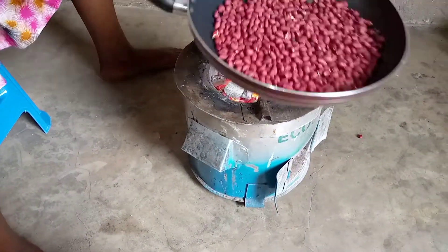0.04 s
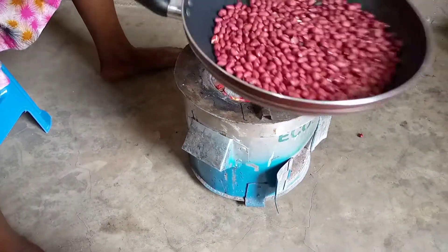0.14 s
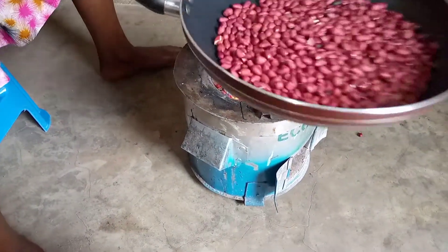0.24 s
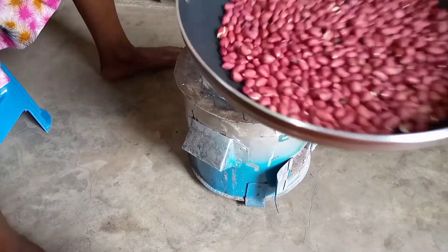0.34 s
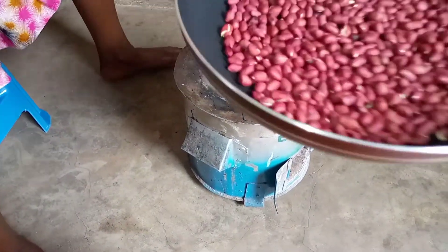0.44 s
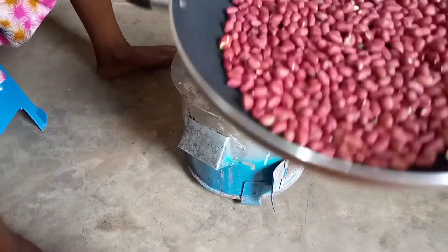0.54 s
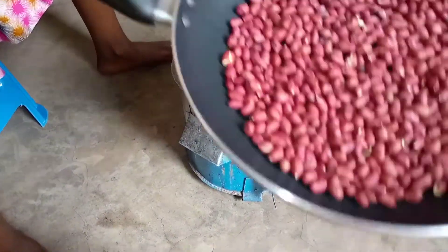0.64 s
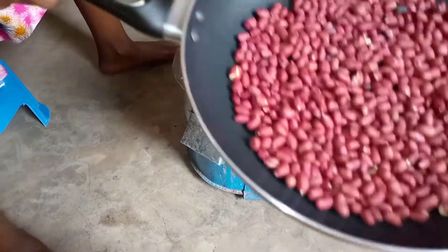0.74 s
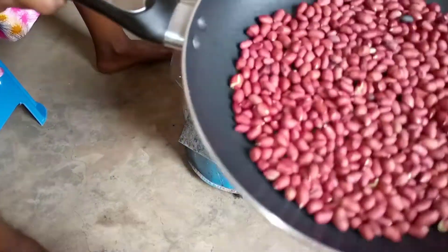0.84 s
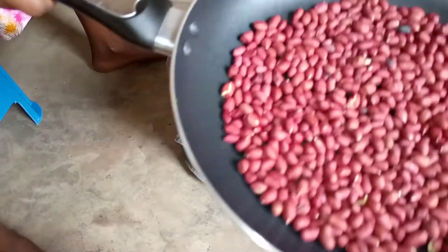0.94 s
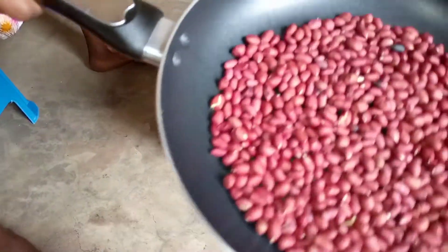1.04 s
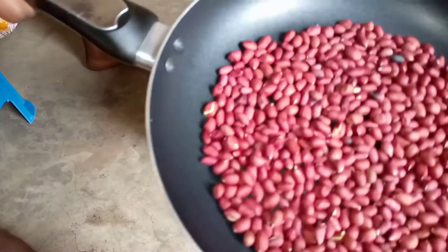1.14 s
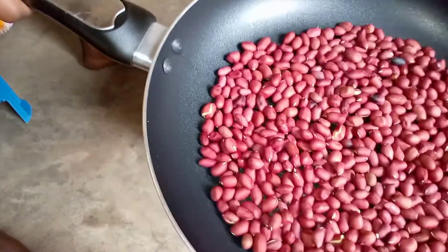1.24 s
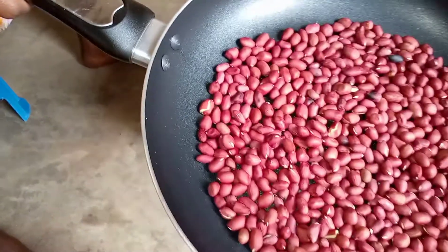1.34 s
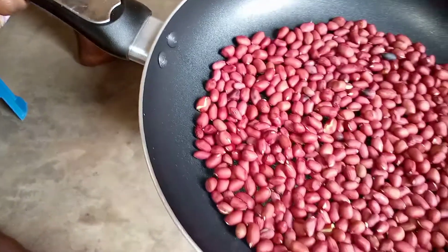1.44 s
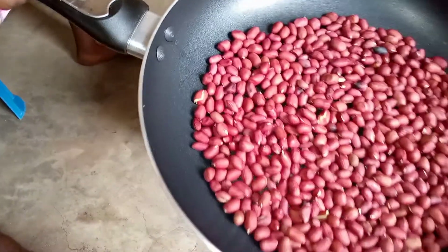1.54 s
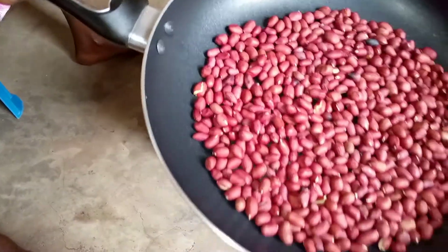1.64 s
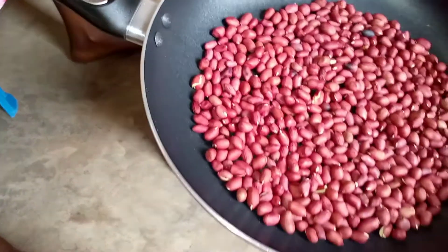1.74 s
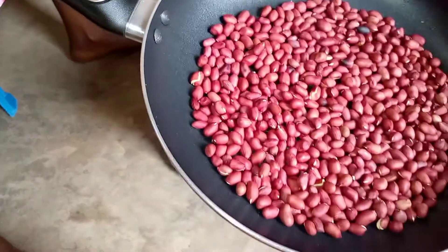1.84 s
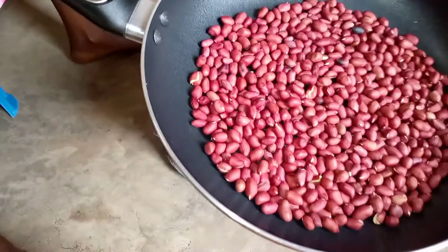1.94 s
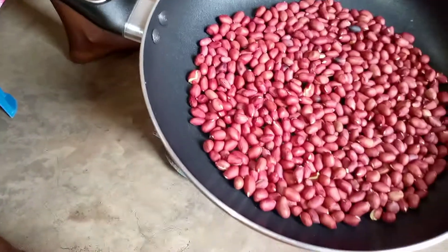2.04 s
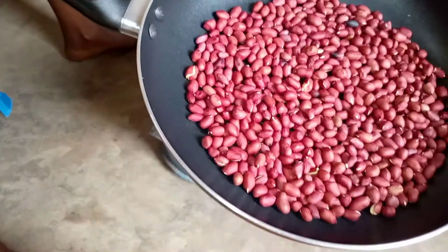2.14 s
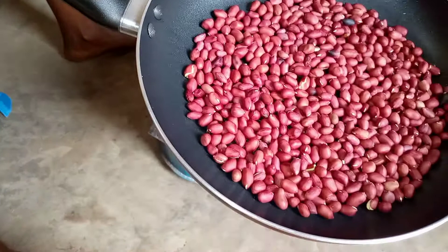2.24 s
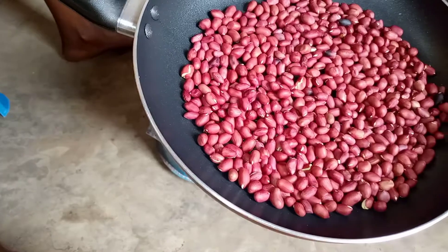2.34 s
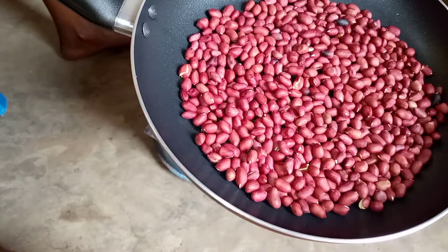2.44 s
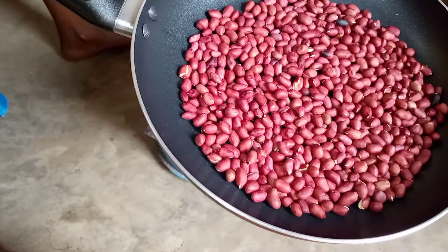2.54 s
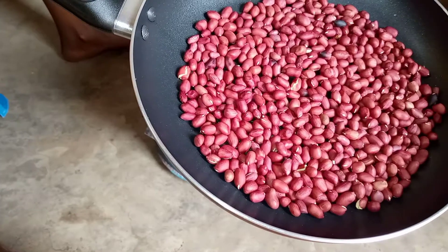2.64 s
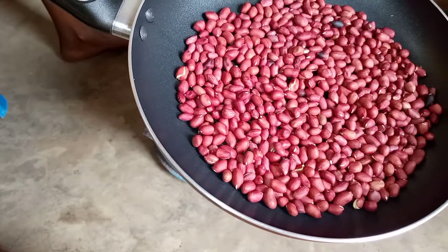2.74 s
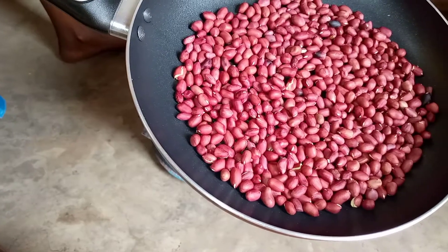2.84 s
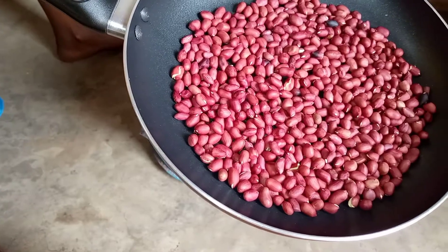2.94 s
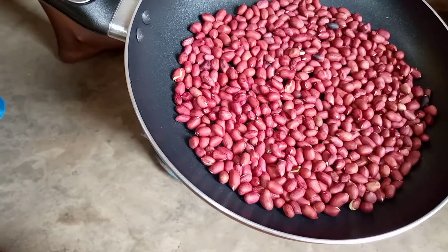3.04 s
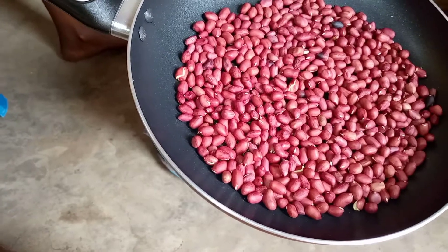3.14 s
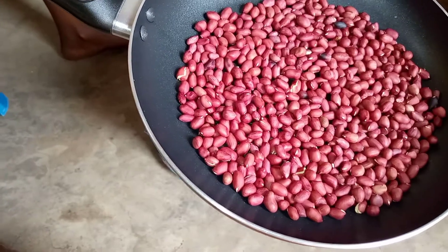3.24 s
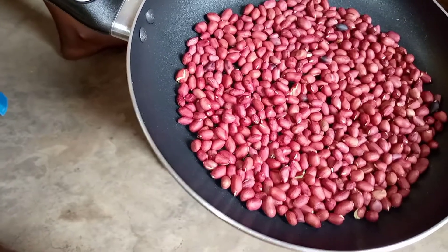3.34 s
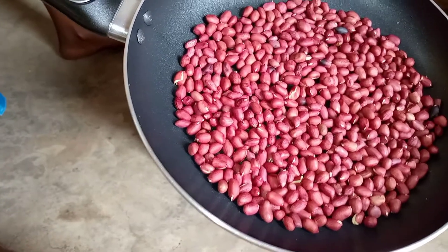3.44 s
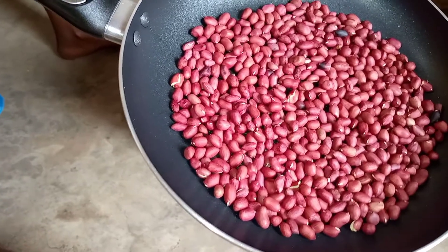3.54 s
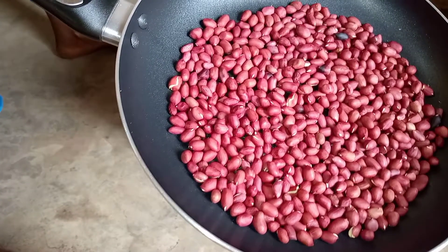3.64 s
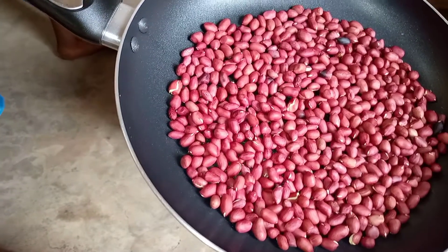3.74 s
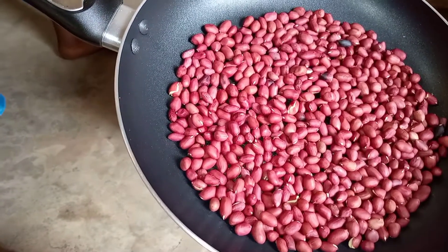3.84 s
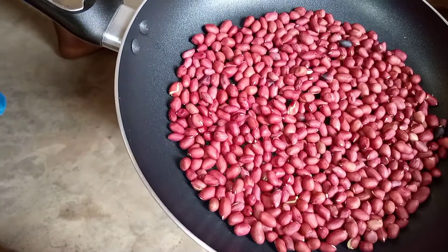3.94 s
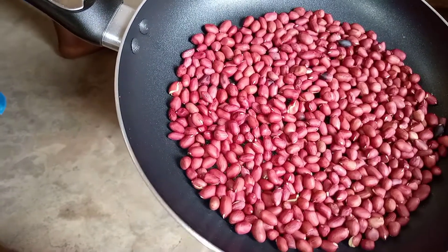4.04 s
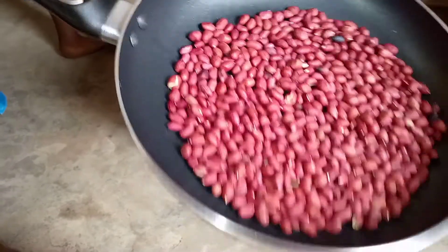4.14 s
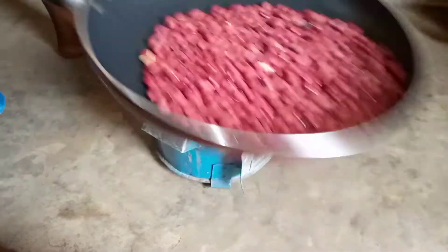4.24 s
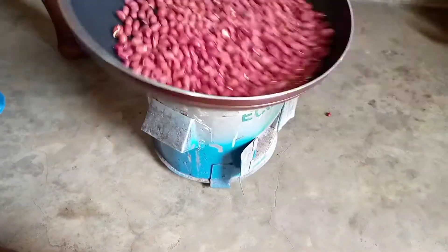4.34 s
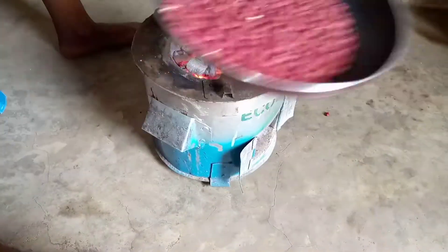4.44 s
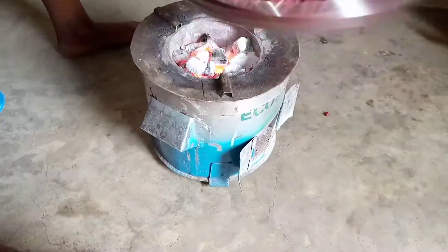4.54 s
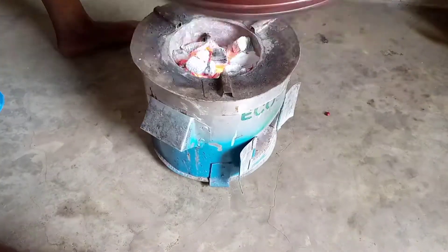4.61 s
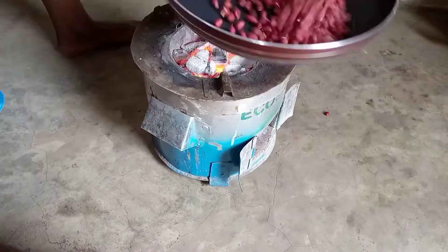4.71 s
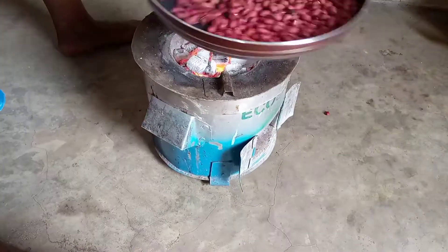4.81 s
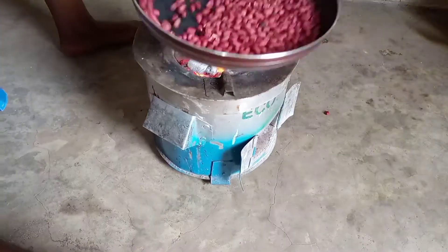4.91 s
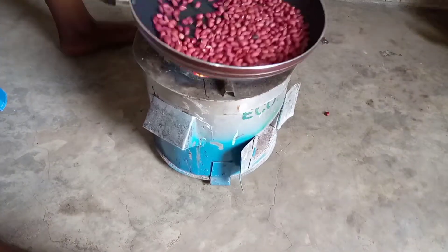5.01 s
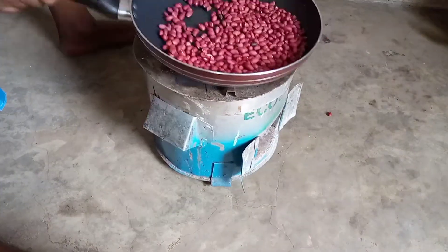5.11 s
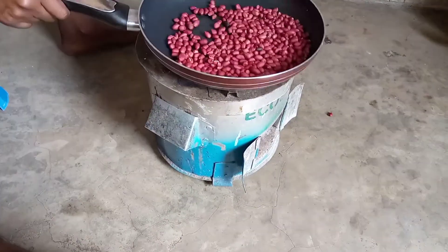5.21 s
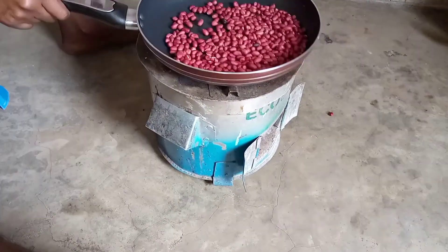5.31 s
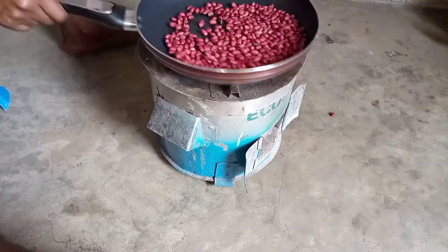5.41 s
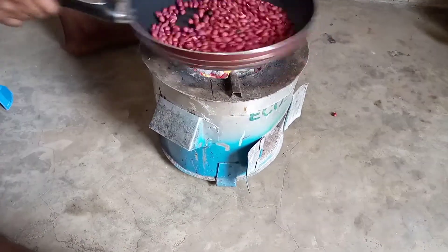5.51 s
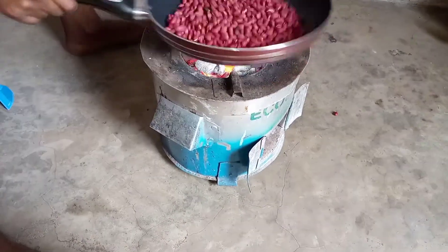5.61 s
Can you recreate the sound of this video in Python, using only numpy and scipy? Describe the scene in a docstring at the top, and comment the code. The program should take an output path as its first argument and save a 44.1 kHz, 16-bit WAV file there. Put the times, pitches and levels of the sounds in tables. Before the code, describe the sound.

Peanuts rattle in a shaken pan, then the pan clacks onto a charcoal stove, amid sharp charcoal snaps and insect buzz.

```python
"""Peanut pan on a charcoal stove

Close by, a pan of peanuts is lifted off a charcoal stove, held still, then swung back, shaken and set down.
Small blows of the sliding nuts ring the pan's modes; charcoal snaps are sharp pulses echoed by hard walls.
Outdoors, insects buzz (a wavering row of partials), chirp and hiss over a low rumble and midrange noise.
At the microphone a fast limiter, keyed by the treble, ducks everything after the loudest snaps."""
import sys
import numpy as np
from scipy import signal
from scipy.fft import rfft, irfft
from scipy.io import wavfile
from scipy.ndimage import uniform_filter1d

SR = 44100
rng = np.random.default_rng(int(sys.argv[2]) if len(sys.argv) > 2 else 0)


def to_wav(s):
    """Save 16-bit WAV."""
    ch = np.atleast_2d(s).T  # columns
    pcm = np.round(np.clip(ch, -1, 1) * 32767)  # PCM
    wavfile.write(sys.argv[1], SR, pcm.astype(np.int16))


N = 250047
T = np.arange(N) / SR
HZ = np.fft.rfftfreq(N, 1 / SR)

# Spectrum levels are relative within each table.
# Modes of the loaded pan: [f/Hz, width/Hz, level/dB]
PAN_MODES = [(638, 19, -7), (694, 20, -8), (813, 22, -18), (985, 30, -11), (1022, 17, -3), (1109, 16, -12),
             (1618, 22, 1), (1734, 22, -11), (2286, 22, -4), (2442, 28, 2.5), (2792, 16, -5),
             (3392, 17, -10), (3723, 12, -5), (4090, 35, -21), (4430, 50, -14), (4530, 45, -11),
             (5086, 32, -11), (5475, 20, -12), (6030, 60, -20), (6420, 32, -13), (6614, 32, -9),
             (7610, 120, -24), (7800, 60, -24), (8230, 40, -27), (8470, 48, -27)]
# Click of nut on nut: [f/Hz, level/dB]
NUT_CLICK = [(60, -44), (150, -27), (330, -18), (490, -28), (650, -10), (1200, -6), (2500, -9), (3100, -17),
             (4700, -9), (7000, -15), (8100, -22), (9700, -18), (10500, -30), (13600, -37), (15200, -26)]
# Slides of the heap: [peak t/s, rise/s, level/dB, fade/(dB/s), bass level/dB, treble level/dB];
# bass and treble are relative to the slide's level
NUT_SLIDES = [(0.0, .05, -30, 150, 1, -10.5), (4.306, 0.09, -40, 74, 10.5, -2),
              (4.477, 0.095, -27.5, 155, 4, -7.5), (4.612, 0.088, -29, 123, 5, -3.5),
              (4.739, 0.02, -22, 55, -3, -10), (4.813, 0.054, -21.5, 105, 0.5, -5),
              (4.918, 0.13, -26.5, 152, -9.5, -4.5), (5.084, 0.11, -45.5, 225.5, 0, 3.5),
              (5.35, 0.089, -43.5, 118, -2.5, -4), (5.622, 0.09, -32, 42, -1, -7.5)]
# Charcoal snaps, relative levels: [t/s, level/dB, brightness/(dB/octave), room level/dB re the snap]
CHARCOAL_SNAPS = [(0.2213, 4, 5.5, -4.5), (0.4452, -37, 2.5, -0.5), (1.1003, -31.5, 5.5, -2),
                  (1.878, -24, 7, -4.5), (2.1109, 4, 0.5, -7.5), (2.179, -16.5, 6, -16),
                  (2.2758, -13.5, 13, -14), (2.5137, -32, 23, -14), (2.6705, -37.5, 23, -14),
                  (2.7313, -20, 3.5, 1.5), (3.162, -30, 7, -8.5), (3.2596, -22.5, 13, -9.5),
                  (3.3206, -27.5, 3, -12), (3.8722, -37, 7, -7.5), (4.4896, -18.5, 8.5, -3.5)]
# Sharp pulse of a snap or a clack: [f/Hz, level/dB]
SNAP_SPECTRUM = [(180, -65), (300, -25), (478, -36), (634, -15), (1190, -12), (2480, -4), (3290, -14),
                 (4370, -3), (5430, -6.5), (6410, 0), (9550, -17), (11500, -21), (13300, -23.5),
                 (15000, -16), (16000, -57.5)]
# The pan knocks on the stove's rest, lands and rocks once:
# [t/s, clack level/dB, thud level/dB, grating level/dB]
PAN_KNOCKS = [(5.2174, -5.5, -36.5, -31.5), (5.327, -20.5, -42.5, -26.5)]
# Dull thud of pan on stove: [f/Hz, level/dB]
THUD_SPECTRUM = [(25, -36), (60, -21.5), (160, -14.5), (340, -15.5), (500, -18.5), (900, -77), (3000, -70)]
# Grit crushed under the pan: [f/Hz, level/dB]
GRIT_SPECTRUM = [(290, -40), (500, -36), (631, -26), (807, -7), (880, -14), (946, -16), (1720, -12),
                 (2390, 6.5), (2890, -8.5), (3200, -29), (4660, 6.5), (5710, -15), (6800, -1.5),
                 (8090, -42), (16000, -63)]
# Echo decay of the surroundings: [f/Hz, t60/s]
ROOM_DECAY = [(150, 0.13), (1000, 0.27), (4000, 0.31), (8000, 0.25), (15000, 0.089)]
# Click rate of the cicada: [t/s, f/Hz]
CICADA_RATE = [(.7, 123), (1.3, 122.5), (3, 122.7), (4, 123.2), (5.67, 122.8)]
# Resonance of the cicada's drum: [f/Hz, level/dB]
CICADA_DRUM = [(5900, -24.5), (6150, -4), (6270, -32), (6390, 5), (6630, 1), (6760, 9.5), (6880, 0),
               (7120, 4.5), (7330, -9), (7490, -2.5), (7600, -12), (7720, -7.5), (7850, -20), (8000, -34)]
# Hiss of the far insects: [f/Hz, level/dB]
CHORUS_SPECTRUM = [(3000, -25), (3900, -27), (4200, -12), (5200, -1.5), (5900, -7.5), (6400, 3.5),
                   (6900, 13), (7400, -6), (8100, -16.5), (9500, -34), (14000, -46), (15500, -25.5)]
# Low rumble: [f/Hz, level/dB]
RUMBLE_SPECTRUM = [(15, -46.5), (25, -24.5), (59, -5), (141, -4), (205, -9), (246, -12.5), (282, -12),
                   (327, -5.5), (399, -18.5), (480, -16), (620, -52), (1060, -120)]
# Course of the rumble, before its gain: [t/s, level/dB]
RUMBLE_COURSE = [(0.0, -64), (0.74, -68.5), (1.76, -65.5), (2.29, -68.5), (2.91, -74), (3.56, -70),
                 (3.91, -75.5), (4.4, -69), (5.1, -73)]
# Midrange wash: [f/Hz, level/dB]
WASH_SPECTRUM = [(260, -67), (450, -8), (583, 1), (749, -2), (811, -1), (1120, -2), (1670, -3.5),
                 (2240, -13.5), (2430, -12.5), (3800, -40.5), (4940, -71), (8360, -120)]
# Course of the wash, before its gain: [t/s, level/dB]
WASH_COURSE = [(0.4, -61.5), (0.92, -66.5), (2.35, -60), (2.9, -66), (3.15, -64), (3.6, -73.5),
               (4.1, -77.5)]
# Colour of the microphone: [f/Hz, level/dB]
MIC_COLOUR = [(390, 0), (480, -6), (590, 0), (10000, 0), (11000, -3), (13500, -3), (14500, 0)]

SLIDE_RISE_DB = 20  # a slide swells by this much during its rise
# Treble rise time and fade rate of a slide, relative to the body's
TREBLE_RISE_RATIO, TREBLE_FADE_RATIO = 0.98, 1
# The skins' rustle lies above this pitch and follows only a share of a slide's treble level
RUSTLE_HZ, RUSTLE_DB, RUSTLE_SHARE = 7900, -16, 0.44
GRATE_RISE_S, GRATE_HOLD_S, GRATE_FADE_DB_PER_S = 0.003, 0.021, 244
CHIRP_FIRST_S, CHIRP_EVERY_S = 0.502, 0.2607
CHIRP_START_DB, CHIRP_GROWTH_DB_PER_S = -64, 0.5
HUM_DB, HUM_END_S, HUM_FADE_DB_PER_S = -59, 0.77, 200
BAND_EDGE_HZ = 16200


def peanuts(hits_per_s=4800, spread_db=3.5, treble_db=4.0, bass_hz=1300, split_hz=3100,
            roam_db=6.5, clump_db=3.0, wet_db=-5, count=16):
    """Thousands of small clumped blows click on other nuts and ring the pan; slides differ in brightness."""
    rattle = np.zeros(N)
    clumps_db = clump_db * flutter(52).real
    for spot in pan_spots(count):
        load = amp(roam_db * flutter(9.5).real + clumps_db)  # the heap roams from spot to spot
        hits = load * blows(hits_per_s / count, spread_db)
        rattle += signal.oaconvolve(hits, spot)[:N]

    treble = above(rattle, split_hz)
    body = rattle - treble
    middle = above(body, bass_hz)
    bass = body - middle
    treble = treble + amp(wet_db) * room(treble).mean(0)  # echoes fill the gaps between the clicks
    rustle = above(treble, RUSTLE_HZ)

    strength = np.sqrt(uniform_filter1d(body ** 2, size=2000))  # so the shake alone sets the slow level
    low, mid, top, air = np.sqrt(sum(slide_powers(*row) for row in NUT_SLIDES))
    shaken = low * bass + mid * middle + amp(treble_db) * top * (treble - rustle) + air * rustle
    return shaken / strength


def pan_spots(count, nut_db=-18):
    """Each spot on the pan answers a blow with all modes and a nut click.

    Each mode starts upward at half of the spots, downward at the others."""
    t = np.arange(SR // 4) / SR
    signs = rng.permuted(np.tile([-1., 1.], (len(PAN_MODES), count // 2)), axis=1)
    spots = np.zeros((count, len(t)))
    for (hz, width, db), sign in zip(PAN_MODES, signs):
        ring = np.exp(-np.pi * width * t) * np.cos(2 * np.pi * hz * t)
        spots += amp(db) * 2 * np.pi * width / SR * ring * sign[:, None]
    for spot in spots:
        add(spot, 0, amp(nut_db) * click(NUT_CLICK))
    return spots


def slide_powers(s, rise, db, fade, low_db, top_db):
    """Power of one slide in the bass, the middle, the treble and the rustle."""
    top_rise, top_fade = rise * TREBLE_RISE_RATIO, fade * TREBLE_FADE_RATIO
    rustle_db = RUSTLE_DB + RUSTLE_SHARE * (db + top_db)
    return np.array([slide(s, rise, db + low_db, fade),
                     slide(s, rise, db, fade),
                     slide(s, top_rise, db + top_db, top_fade),
                     slide(s, top_rise, rustle_db, fade)])


def slide(peak_s, rise_s, db, fade_db_per_s):
    """Power of one slide: the heap gathers speed, then runs out."""
    swell_db = -SLIDE_RISE_DB * (np.maximum(peak_s - T, 0) / rise_s) ** 2
    fall_db = -fade_db_per_s * np.maximum(T - peak_s, 0)
    return amp(db + swell_db + fall_db) ** 2


def blows(per_s, spread_db):
    """Random small impacts, a few of them large."""
    sizes = amp(spread_db * np.minimum(rng.exponential(1, N), 4))
    return (rng.random(N) < per_s / SR) * sizes * rng.choice([-1, 1], N)


def charcoal(crumble_db=-21, side_db=-11, lump_hz=4600, lump_db=-15, lump_s=0.00061):
    """Sharp pulse, brief lump ring, splintering; a little random treble differs between left and right."""
    direct, side, sent = np.zeros(N), np.zeros(N), np.zeros(N)
    t = np.arange(400) / SR
    crack = (t == 0) + amp(lump_db) * np.exp(-t / lump_s) * np.cos(2 * np.pi * lump_hz * t)
    grits = rng.standard_normal((len(CHARCOAL_SNAPS), 2, len(t)))
    for (s, db, tilt_db, room_db), grit in zip(CHARCOAL_SNAPS, grits):
        pulse = click(SNAP_SPECTRUM, tilt_db)
        pulse *= 3.2 * amp(db) / np.linalg.norm(pulse)
        splinters, side_grit = grit * np.exp(-t / 0.0016) * (t > 0)
        snap = np.convolve(pulse, crack + amp(crumble_db) * splinters)
        # ring and splinters leave the energy of the snap unchanged
        add(direct, s, snap * np.linalg.norm(pulse) / np.linalg.norm(snap))
        add(side, s, amp(side_db) * np.convolve(pulse, side_grit / np.linalg.norm(side_grit)))
        add(sent, s, amp(room_db) * pulse)
    side = signal.sosfilt(signal.butter(4, 7000, "high", fs=SR, output="sos"), side)
    return direct + np.array([side, -side]) + room(sent)


def clacks(ring_db=-12, ring_s=0.00067, room_db=9):
    """The hard, gritty contact of pan and stove, and its echo from the walls."""
    t = np.arange(600) / SR
    direct, sent = np.zeros(N), np.zeros(N)
    pulse = click(SNAP_SPECTRUM)
    pulse = pulse / np.linalg.norm(pulse)
    grits = rng.standard_normal((len(PAN_KNOCKS), len(t)))
    for (s, db, _, _), grit in zip(PAN_KNOCKS, grits):
        contact = (t == 0) + amp(ring_db) * grit * np.exp(-t / ring_s)
        add(direct, s, amp(db) * np.convolve(pulse, contact))
        add(sent, s, amp(db + room_db) * pulse)
    return direct + room(sent)


def bumps(t60=0.31, rise_s=0.016, boom_hz=55, boom_width_hz=14, boom_db=-21, boom_t60=1.7):
    """Dull thuds of the pan on the stove, as decaying noise; a deep boom lingers."""
    thud, out = noise(THUD_SPECTRUM), np.zeros(N)
    boom = unit((flutter(boom_width_hz) * np.exp(2j * np.pi * boom_hz * T)).real)
    for s, _, db, _ in PAN_KNOCKS:
        age = np.maximum(T - s, 0)
        decaying = thud * amp(-60 * age / t60) + boom * amp(boom_db - 60 * age / boom_t60)
        out += amp(db) * (1 - np.exp(-age / rise_s)) * decaying
    return out


def grate(grains_per_s=5000, spread_db=3):
    """Grit is crushed between the pan and the stove after each knock."""
    crunch = unit(signal.oaconvolve(blows(grains_per_s, spread_db), click(GRIT_SPECTRUM))[:N])
    return crunch * sum(amp(db) * held(s, GRATE_RISE_S, GRATE_HOLD_S, GRATE_FADE_DB_PER_S)
                        for s, _, _, db in PAN_KNOCKS)


def held(start_s, rise_s, hold_s, fade_db_per_s):
    """Attack, hold (timed from the start) and release."""
    attack = np.clip((T - start_s) / rise_s, 0, 1)
    return attack * amp(-fade_db_per_s * np.maximum(T - start_s - hold_s, 0))


def room(x, gap_s=0.016, early_db=-9, treble_spread=0.04):
    """Quieter early floor reflections, then after a gap the dense wall echo; only its treble is wide."""
    t = np.arange(SR * 3 // 4) / SR
    taps = rng.standard_normal((2, len(t))) * (rng.random((2, len(t))) < 0.2)
    taps *= np.where(t < gap_s, amp(early_db), 1) * (t > 0.001)
    hz, s, z = signal.stft(taps, SR, nperseg=256)
    z *= amp(-60 * s / read(ROOM_DECAY, hz)[:, None])
    z[1] *= (treble_spread * np.clip((hz - 4000) / 6000, 0, 1))[:, None]
    mid, side = signal.istft(z, SR, nperseg=256)[1]
    echo = np.array([mid + side, mid - side]) / np.linalg.norm(mid)
    return signal.fftconvolve(x[None], echo, axes=1)[:, :N]


def cicada(level_db=-48, scatter=0.75, scatter_hz=26):
    """About 123 clicks a second ring a drum near 6.8 kHz; echoes make each partial waver on its own."""
    turns = np.cumsum(curves(CICADA_RATE)[0]) / SR
    rate_hz = turns[-1] / T[-1]
    buzz = np.zeros(N, complex)
    for k in range(49, 66):  # the partials that the drum lets through
        steady = (1 - scatter) * np.exp(2j * np.pi * rng.random())
        wavering = steady + scatter * flutter(scatter_hz)
        buzz += amp(read(CICADA_DRUM, k * rate_hz)) * np.exp(2j * np.pi * k * turns) * wavering
    return amp(level_db) * unit(buzz.real)


def chirps(centre_hz=4500, width_hz=230, glide_hz_per_s=2200, length_s=0.062):
    """Far rasping chirps at an even beat, each rising a little, nearly four a second."""
    rasp, out = flutter(width_hz), np.zeros(N)
    for s in np.arange(CHIRP_FIRST_S, T[-1], CHIRP_EVERY_S):
        near = abs(T - s) < 3 * length_s
        t = T[near] - s
        tone = np.exp(2j * np.pi * (centre_hz + glide_hz_per_s * t / 2) * t)
        out[near] += np.exp(-(t / length_s) ** 2) * (rasp[near] * tone).real
    return np.sqrt(2) * amp(CHIRP_START_DB + CHIRP_GROWTH_DB_PER_S * T) * out


def hum(pitch_hz=208, unsteady=0.96, width_hz=16):
    """A low hum that wavers, holds and fades."""
    tone = (1 + unsteady * flutter(width_hz)) * np.exp(2j * np.pi * pitch_hz * T)
    return amp(HUM_DB - HUM_FADE_DB_PER_S * np.maximum(T - HUM_END_S, 0)) * unit(tone.real)


def background(rumble_db=7, wash_db=2.0, chorus_db=-52):
    """Low rumble, a restless midrange wash and the hiss of far insects, all patchy noise."""
    rumble = patchy(noise(RUMBLE_SPECTRUM), patchy_db=3, patch_hz=30, patch_s=0.054)
    wash = patchy(noise(WASH_SPECTRUM), patchy_db=5, patch_hz=55, patch_s=0.05)
    chorus = patchy(noise(CHORUS_SPECTRUM), patchy_db=4.0, patch_hz=150, patch_s=0.029)
    rumble *= amp(rumble_db + curves(RUMBLE_COURSE)[0])
    wash *= amp(wash_db + curves(WASH_COURSE)[0])
    return rumble + wash + amp(chorus_db) * chorus


def patchy(x, patchy_db, patch_hz, patch_s):
    """Small islands of pitch and time swell and fade at random."""
    z = signal.stft(x, SR, nperseg=2048, noverlap=1536)[2]
    across_hz = np.exp(-(np.arange(-8, 9) * SR / 2048 / patch_hz) ** 2)
    across_s = np.exp(-(np.arange(-20, 21) * 512 / SR / patch_s) ** 2)
    island = np.outer(across_hz, across_s)
    field = unit(signal.fftconvolve(rng.standard_normal(z.shape), island, "same"))
    return unit(signal.istft(z * amp(patchy_db * field), SR, nperseg=2048, noverlap=1536)[1][:N])


def noise(points):
    """Steady noise of a given spectrum, at rms 1."""
    return unit(irfft(rfft(rng.standard_normal(N)) * amp(read(points, HZ)), N))


def flutter(width_hz):
    """Complex random wavering about width_hz fast, at rms 1."""
    z = rng.standard_normal(N) + 1j * rng.standard_normal(N)
    return unit(np.fft.ifft(z * np.exp(-(np.fft.fftfreq(N, 1 / SR) / width_hz) ** 2)))


def click(points, tilt_db=0, size=2048):
    """Causal (minimum-phase) pulse of a given spectrum, tilted per octave above 2 kHz."""
    hz = abs(np.fft.fftfreq(size, 1 / SR))
    tilt = tilt_db * np.log2(np.maximum(hz / 2000, 1))
    log_gain = np.log(amp(read(points, hz) + tilt))
    return np.fft.ifft(np.exp(np.conj(signal.hilbert(log_gain)))).real[:size // 2]


def above(x, edge_hz):
    """The part of a sound above edge_hz."""
    return irfft(rfft(x) / (1 + (edge_hz / (HZ + 1)) ** 8), N)


def amp(db):
    """Amplitude factor of a level in dB."""
    return 10 ** (np.asarray(db) / 20)


def unit(x):
    """Scales to rms 1."""
    return x / np.sqrt(np.mean(abs(x) ** 2) + 1e-20)


def read(points, hz):
    """Reads a spectrum on a log-frequency axis."""
    f, value = np.transpose(points)
    return np.interp(np.log(hz + 1), np.log(f + 1), value)


def curves(rows):
    """The columns of a time table, at every sample."""
    s, *columns = np.transpose(rows)
    return [np.interp(T, s, c) for c in columns]


def add(mix, s, sound):
    """Mixes a sound in at time s."""
    part = mix[max(round(s * SR), 0):][:len(sound)]
    part += sound[:len(part)]


def scene():
    """The stove and the pan close by, the insects and the background behind them."""
    stove_and_pan = charcoal() + peanuts() + clacks() + bumps() + grate()
    return stove_and_pan + cicada() + chirps() + hum() + background()


def record(dry, threshold_db=-25, recover_db_per_s=170, strength=0.87, ceiling=1.0):
    """Microphone colour, a fast limiter keyed by the treble, rounded peaks, then the band limit."""
    dry = irfft(rfft(dry) * amp(read(MIC_COLOUR, HZ)), N)
    treble = signal.sosfilt(signal.butter(2, 3500, "high", fs=SR, output="sos"), dry.mean(0))
    power_db = 10 * np.log10(abs(uniform_filter1d(treble ** 2, size=440)) + 1e-12)
    # the detector jumps up with the treble and falls back at a steady rate
    fall = T * recover_db_per_s
    detector_db = np.maximum.accumulate(power_db + fall) - fall
    over_db = np.maximum(detector_db - threshold_db, 0)
    ducked = dry * amp(-strength * uniform_filter1d(over_db, size=260))
    rounded = ceiling * np.tanh(ducked / ceiling)
    band_limit = signal.firwin(511, BAND_EDGE_HZ, window=("kaiser", 9), fs=SR)
    return signal.oaconvolve(rounded, band_limit[None], "same", axes=1)


dry = scene()
out = record(dry)
to_wav(out)
```